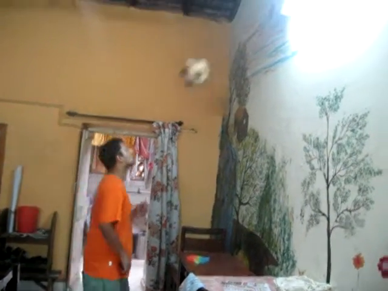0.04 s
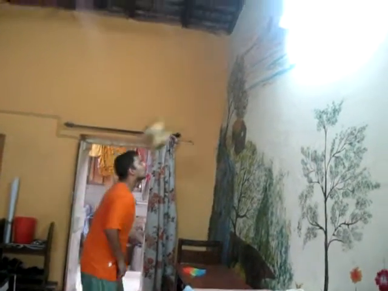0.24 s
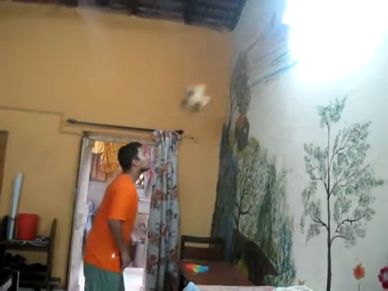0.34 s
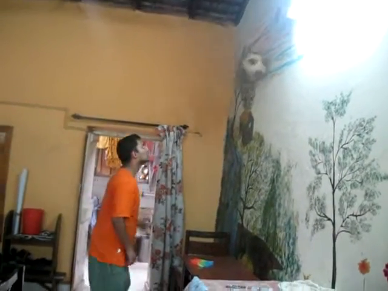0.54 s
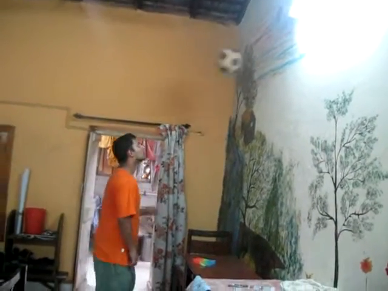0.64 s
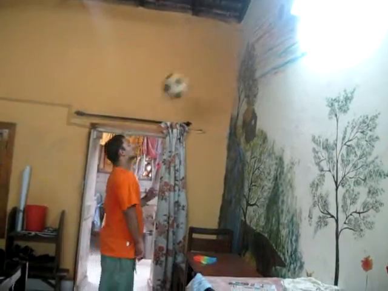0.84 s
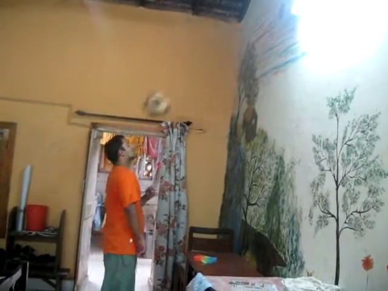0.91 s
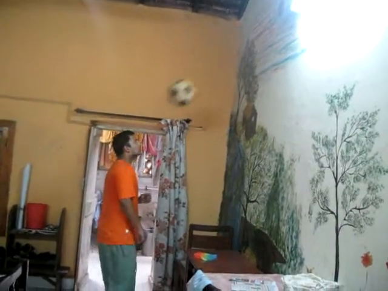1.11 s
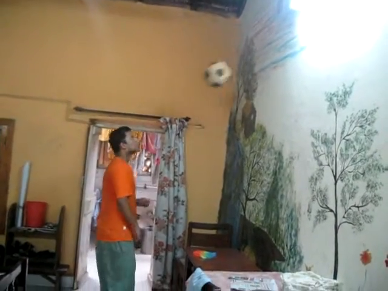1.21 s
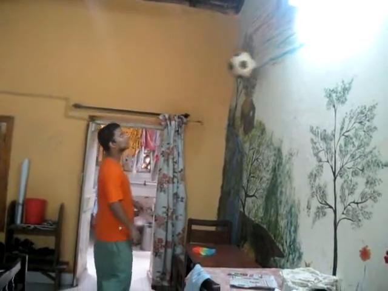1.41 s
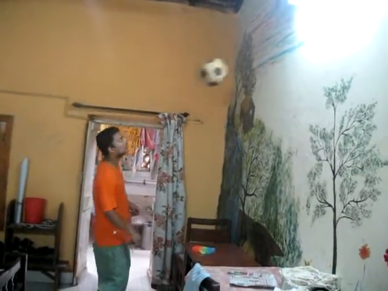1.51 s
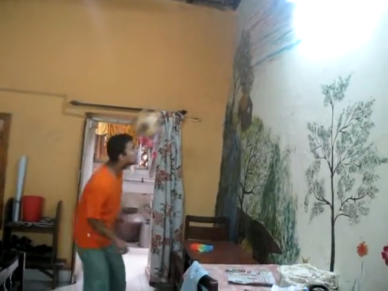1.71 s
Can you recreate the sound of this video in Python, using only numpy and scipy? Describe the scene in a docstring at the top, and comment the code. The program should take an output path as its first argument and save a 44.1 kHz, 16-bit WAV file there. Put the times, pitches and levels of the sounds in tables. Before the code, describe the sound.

Four ball thuds, alternating between head and wall, with light room echo and steady hiss.

```python
"""In a bare, slightly echoing room a football is headed against a wall twice: head, wall, head, wall.
Each impact radiates a sharp pressure pulse and sets the ball's air and skin ringing briefly.
The room answers with reflections and reverberation; the headers also set its low modes booming.
Feet shuffle between the blows, over a steady hiss and a low hum, heard through a narrow-band microphone."""
import sys
import numpy as np
from scipy import signal
from scipy.fft import rfft, irfft, next_fast_len
from scipy.io import wavfile
from scipy.ndimage import map_coordinates

SR = 44100
rng = np.random.default_rng(int(sys.argv[2]) if len(sys.argv) > 2 else 0)


def bounce(signal):
    """Save signal as a 16-bit WAV file at the path given by the first command-line argument."""
    frames = np.transpose(np.atleast_2d(signal))
    limited = np.clip(frames, -1, 1)
    pcm = np.round(limited * 32767).astype(np.int16)
    wavfile.write(sys.argv[1], SR, pcm)


N = 77175

# impacts on head and wall: (time [s], echo and ring gain [dB], treble tilt [dB], slap gain [dB],
# boom gain [dB], knock gain [dB], room mode gain [dB], hollow pitch [Hz], boost [dB], width [octaves])
HEAD_IMPACTS = [(0.2591, 0, -6.5, 1.5, 2.5, -20, 1, 850, 6.5, 0.18),
                (1.0348, 0, 1.5, -0.5, 3, -1, 2, 623, 1.5, 0.15)]
WALL_IMPACTS = [(0.5819, 3.5, 1.5, 1, -23, -3, -12.5, 1340, 2.5, 0.14),
                (1.3918, -1, -1, 2.5, -17, -3, -28, 3440, 13, 0.66)]
# damped modes: (frequency [Hz], level [dB], t60 [s])
BALL_MODES = [(647, -48.5, 0.32), (751, -42, 0.98), (822, -39, 0.37), (835, -36.5, 0.64), (1108, -30, .3),
              (978, -37.5, 1), (1230, -34, 0.67), (1310, -51, 0.46), (1538, -39, 0.58), (1816, -40, 0.64)]  # air and skin
SHELL_MODES = [(113.5, -30.5, 0.2), (236.8, -30, 0.074)]  # the shell flexing
BOOM_MODES = [(39.66, -32, 1.1), (53.8, -17, 0.33), (60.5, -15.5, .235), (71.8, -20, 0.17)]  # the room's deepest standing waves, beating together
UPPER_ROOM_MODES = [(107.1, -25.5, 0.54), (195.2, -28, 0.39), (237.3, -36.5, .38), (270.4, -35, 0.63),
                    (367.5, -25, 0.27)]  # its higher standing waves
# first reflections off nearby surfaces: (delay [s], level [dB])
REFLECTIONS = [(.0041, -13.5), (.0069, -5.5)]
# reverberation time of the room: (frequency [Hz], t60 [s])
REVERB_T60 = [(60, 0.8), (200, .5), (500, 0.56), (1200, 0.35), (3000, 0.43), (6000, 0.51)]
# noise spectra: (frequency [Hz], relative level [dB])
HEAD_ECHO_SPECTRUM = [(22, -49), (40, -18.5), (140, -13.5), (230, -1.5), (430, -4.5), (620, 0.5),
                      (900, -3.5), (1100, -1.5), (1700, -7.5), (2300, -11), (3000, -11.5), (4800, -18.5),
                      (6200, -34.5), (7500, -43)]
WALL_ECHO_SPECTRUM = [(30, 4.5), (110, -7.5), (170, -10), (250, 3), (400, -11.5), (800, -3.5), (1350, 1),
                      (1700, -5.5), (2800, -13.5), (4800, -18.5), (6200, -27.5), (7500, -39)]
CRACK_SPECTRUM = [(200, -8.5), (500, -4.5), (1500, 3.5), (3000, 1), (5000, 2.5), (6500, -12), (7500, -36.5)]
SOLE_SPECTRUM = [(200, -14.5), (750, -1), (1200, -5), (2500, -6), (3800, 0.5), (5000, -6), (6300, -15.5),
                 (7500, -33.5)]
HISS_SPECTRUM = [(20, -24), (30, -11), (42, 18.5), (60, 4.5), (110, 2), (170, -2), (320, 1.5), (800, -0.5),
                 (1400, -1), (2200, -5), (4300, -9), (5300, -12.5), (6300, -21.5), (7500, -40)]
WASH_SPECTRUM = [(100, -47.5), (350, 1), (520, 0.5), (710, 3), (950, -4), (1300, 1), (1650, -15.5),
                 (3000, -30.5)]
RUMBLE_SPECTRUM = [(22, -32), (32, -13), (42, -7), (55, -17), (80, 1), (110, -5.5), (150, -9.5),
                   (190, -6.5), (270, -12), (500, -32), (1500, -64)]
# slides of the feet: (centre time [s], half length [s], level [dB])
SLIDES = [(.01, 0.053, -46), (0.233, 0.08, -46), (0.418, 0.036, -43), (0.493, 0.072, -40),
          (0.988, 0.069, -52), (1.714, .06, -45)]
# partials of a sole's squeak: (frequency [Hz], level [dB])
SQUEAK_PARTIALS = [(520, -49.5), (1410, -42.5), (3480, -49.5)]
# envelopes of the midrange wash and the bass: (time [s], level [dB])
WASH_LEVELS = [(0, -45.5), (.12, -47), (.22, -41.5), (.5, -43), (.8, -50), (1.0, -48), (1.33, -45),
               (1.5, -43), (1.62, -73), (1.75, -45)]
BASS_LEVELS = [(0, -44), (.2, -45.5), (.55, -46), (.8, -55.5), (.92, -47), (1.35, -47), (1.5, -50),
               (1.62, -57), (1.75, -55)]

SLAP_DB, SLAP_WIDTH_S, SQUASH_S = -11, .000055, .0065
CRACK_T60_S, CORNER_DELAY_S, CORNER_T60_S = .053, .0064, .029
TILT_HZ, NEAR_T60_S = 1400, .083
SQUEAK_S, SQUEAK_HALF_S = 1.712, .012
HISS_DB, HUM_HZ, HUM_DB = -44, 118, -1
LOW_CUT_HZ, HIGH_CUT_HZ, BAND_LIMIT_HZ = 40, 6900, 7850


def ball_impacts(rows, spectrum, echo_db, build_s, near_db, ring_db, crack_db, walls_db):
    """Impulse excitation: each contact slaps and starts free vibrations of the ball and the room."""
    out = np.zeros(N)
    for s, db, tilt_db, slap_db, boom_db, knock_db, modes_db, *hollow in rows:
        ball = [(hz, level + resonance_db(hz, *hollow), t60) for hz, level, t60 in BALL_MODES]
        out += amp(slap_db) * (amp(SLAP_DB) * slap(s, walls_db) + amp(crack_db) * crack(s, walls_db))
        out += amp(echo_db + db) * echo(s, spectrum, tilt_db, hollow, build_s, near_db)
        out += amp(ring_db + db) * ring(ball, s, attack_s=.008, drift_rad=.62)
        out += amp(knock_db) * ring(SHELL_MODES, s, attack_s=.002, drift_rad=.2)
        out += amp(boom_db) * ring(BOOM_MODES, s + SQUASH_S, attack_s=.038, drift_rad=0)
        out += amp(modes_db) * ring(UPPER_ROOM_MODES, s, attack_s=.037, drift_rad=.28)
    return out


def slap(s, walls_db):
    """Impact radiation: the skin meets a surface and sends out one pulse, followed by its reflections."""
    t = np.arange(N) / SR - s
    pulse = lambda delay: np.exp(-.5 * ((t - delay) / SLAP_WIDTH_S) ** 2)
    reflected = sum(amp(db + walls_db) * pulse(delay) for delay, db in REFLECTIONS)
    high_pass = signal.butter(1, 150, "high", fs=SR, output="sos")
    return signal.sosfilt(high_pass, reflected - pulse(0))


def crack(s, walls_db):
    """Scattering: a bright burst follows the slap, and the adjoining wall throws it back."""
    burst = lambda start, t60: amp(-60 * since(start) / t60) * (since(start) > 0)
    reflected = amp(walls_db) * burst(s + CORNER_DELAY_S, CORNER_T60_S)
    return (burst(s, CRACK_T60_S) + reflected) * noise(CRACK_SPECTRUM)


def ring(modes, s, attack_s, drift_rad):
    """Damped oscillation: modes struck at time s swell, then decay exponentially as their phases drift."""
    t = since(s)
    swell = 1 - np.exp(-t / attack_s)
    return swell * sum(amp(db - 60 * t / t60) * np.sin(2 * np.pi * hz * t + drift_rad * wobble(40))
                       for hz, db, t60 in modes)


def resonance_db(hz, centre_hz, boost_db, octaves):
    """Resonance: a bell-shaped boost around one pitch makes the contact sound hollow."""
    return boost_db * np.exp(-(np.log2((hz + 1) / centre_hz) / octaves) ** 2)


def echo(s, spectrum, tilt_db, hollow, build_s, near_db):
    """Reverberation: quick scatter from the corner, and a swelling tail with a decay rate for each band."""
    def tone(hz):
        shelf_db = tilt_db / 2 * (hz ** 4 - TILT_HZ ** 4) / (hz ** 4 + TILT_HZ ** 4)
        return amp(shelf_db + resonance_db(hz, *hollow))
    t = since(s)
    hz, frame_s, bands = signal.stft(filtered(noise(spectrum), tone), SR, nperseg=512)
    decay = amp(-60 * np.maximum(frame_s - s, 0) / along(REVERB_T60, hz)[:, None])
    tail = signal.istft(bands * decay, SR, nperseg=512)[1][:N]
    swell = 1 - np.exp(-t / build_s)
    near = filtered(noise(spectrum), tone) * amp(near_db - 60 * t / NEAR_T60_S) * (t > 0)
    return swell * tail + near


def feet():
    """Sliding friction: soles rub the floor in soft swells of noise; the last slide squeaks faintly."""
    t = since(0)
    swell = lambda s, half: np.exp(-((t - s) / half) ** 2)
    level = sum(amp(db) * swell(s, half) for s, half, db in SLIDES)
    squeak = sum(amp(db) * np.sin(2 * np.pi * hz * t + .46 * wobble(60.9)) for hz, db in SQUEAK_PARTIALS)
    rubbing = level * amp(1.2 * wobble(50)) * noise(SOLE_SPECTRUM)
    return rubbing + swell(SQUEAK_S, SQUEAK_HALF_S) * squeak


def background():
    """Ambient noise: steady hiss, with a midrange wash, a rumble and a wavering hum that swell and fade."""
    t = since(0)
    level = lambda rows: amp(np.interp(t, *np.transpose(rows)))
    hum = amp(HUM_DB + 6 * wobble(5.3)) * np.sin(2 * np.pi * HUM_HZ * t + 2.1 * wobble(10))
    hiss = amp(HISS_DB) * noise(HISS_SPECTRUM)
    wash = level(WASH_LEVELS) * noise(WASH_SPECTRUM)
    bass = level(BASS_LEVELS) * (noise(RUMBLE_SPECTRUM) + hum)
    return hiss + wash + bass


def noise(spectrum):
    """Spectral shaping: white noise coloured and scaled to rms 1."""
    coloured = filtered(rng.standard_normal(N), lambda hz: amp(along(spectrum, hz)))
    return coloured / np.sqrt(np.mean(coloured ** 2) + 1e-20)


def filtered(x, response):
    """Linear filtering: the spectrum of x times a frequency response."""
    size = next_fast_len(N + SR // 2)
    return irfft(rfft(x, size) * response(np.fft.rfftfreq(size, 1 / SR)), size)[:N]


def along(points, hz):
    """Interpolation on a logarithmic frequency axis."""
    knots_hz, values = np.transpose(points)
    return np.interp(np.log(hz + 1), np.log(knots_hz + 1), values)


def wobble(rate):
    """Random modulation: a smooth curve with rate knots a second."""
    return map_coordinates(rng.standard_normal(512), [np.arange(N) * rate / SR], mode="wrap")


def since(s):
    """Causal time: seconds since s, zero before."""
    return np.maximum(np.arange(N) / SR - s, 0)


def amp(db):
    """Decibel law: level to amplitude ratio."""
    return 10 ** (np.asarray(db) / 20)


def scene():
    """Superposition: headers, rebounds close to the corner, feet and background add."""
    headers = ball_impacts(HEAD_IMPACTS, HEAD_ECHO_SPECTRUM, echo_db=-20.5, build_s=.021,
                           near_db=-3, ring_db=0, crack_db=-30.5, walls_db=-6)
    rebounds = ball_impacts(WALL_IMPACTS, WALL_ECHO_SPECTRUM, echo_db=-28, build_s=.011,
                            near_db=-5.5, ring_db=-9.5, crack_db=-32.5, walls_db=.5)
    return (headers + rebounds + feet() + background())[None]


def record(dry):
    """Band-pass response: the microphone drops the deepest bass and passes nothing above its limit."""
    def band(hz):
        treble_loss = 1 + (hz / HIGH_CUT_HZ) ** 40
        bass_loss = 1 + (LOW_CUT_HZ / (hz + 1)) ** 12
        return (hz < BAND_LIMIT_HZ) / np.sqrt(treble_loss * bass_loss)
    return filtered(dry[0], band)[None]


dry = scene()
out = record(dry)
bounce(out)
```